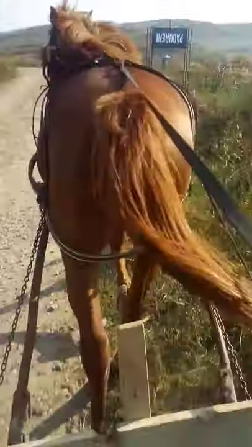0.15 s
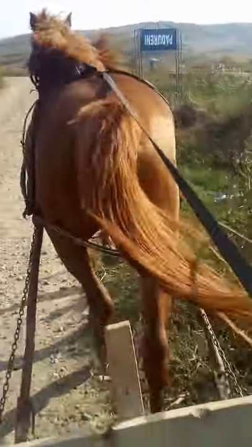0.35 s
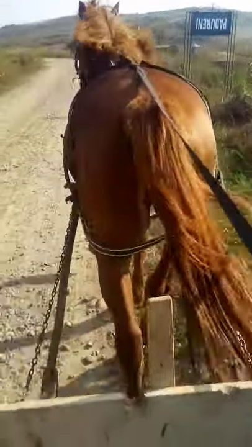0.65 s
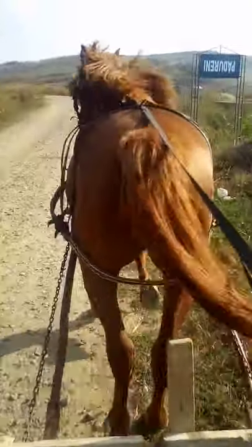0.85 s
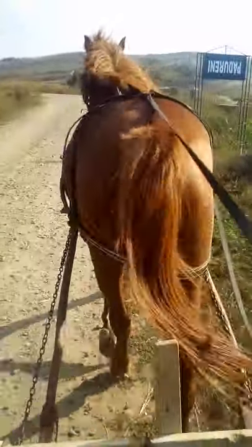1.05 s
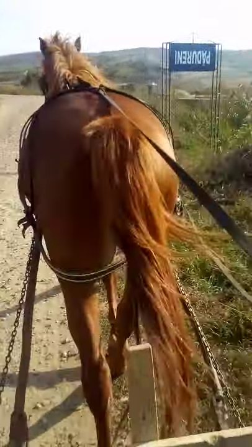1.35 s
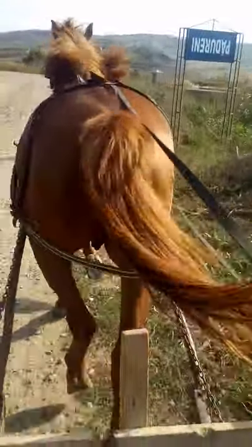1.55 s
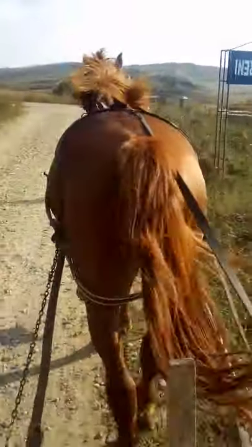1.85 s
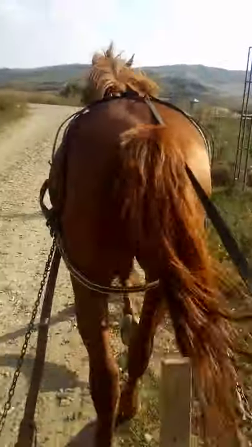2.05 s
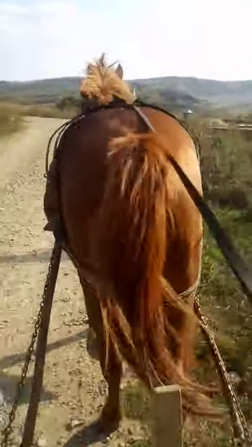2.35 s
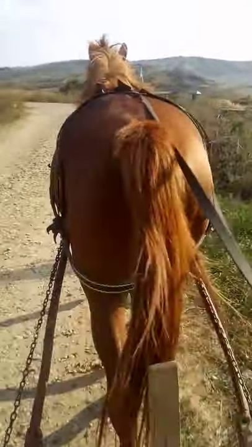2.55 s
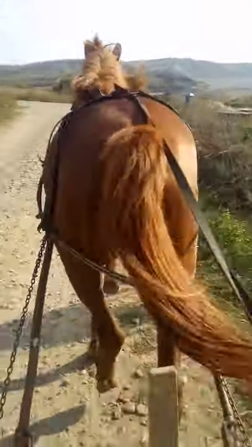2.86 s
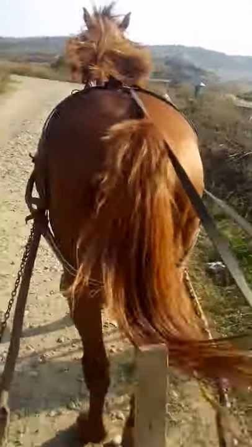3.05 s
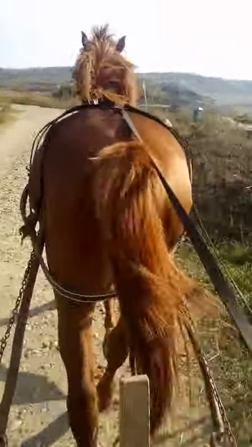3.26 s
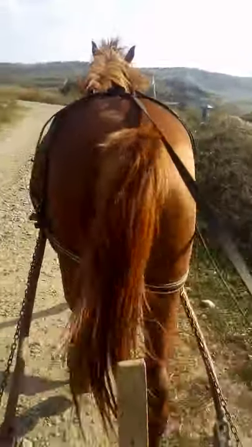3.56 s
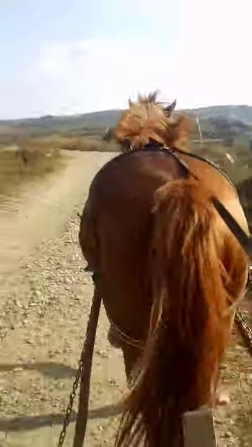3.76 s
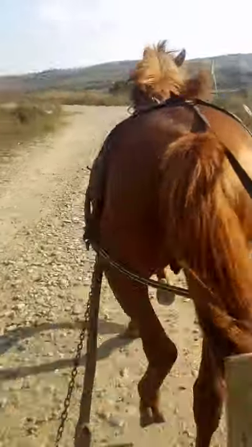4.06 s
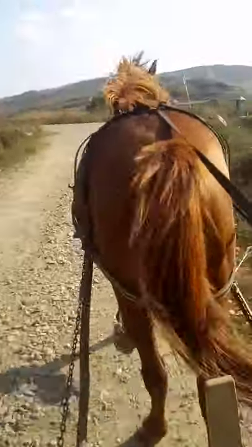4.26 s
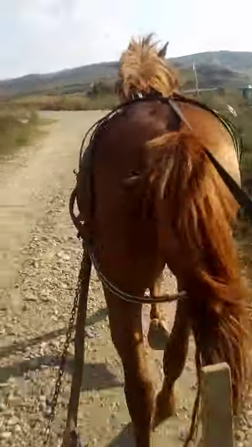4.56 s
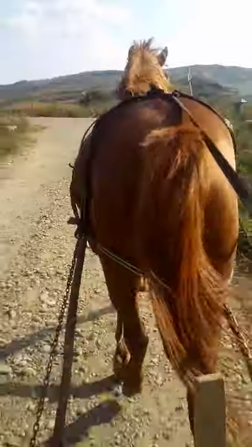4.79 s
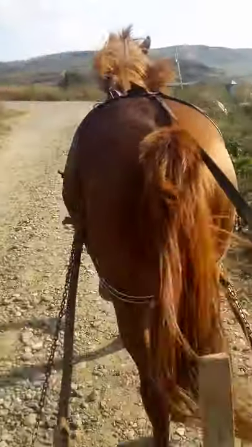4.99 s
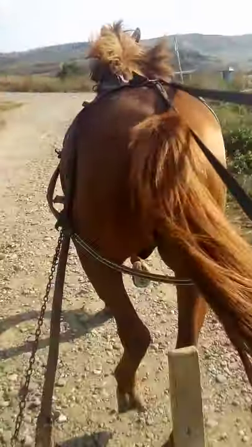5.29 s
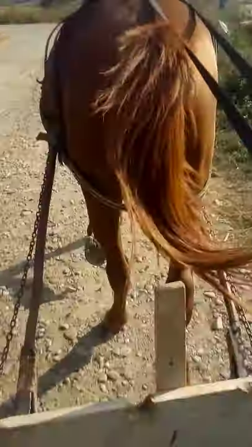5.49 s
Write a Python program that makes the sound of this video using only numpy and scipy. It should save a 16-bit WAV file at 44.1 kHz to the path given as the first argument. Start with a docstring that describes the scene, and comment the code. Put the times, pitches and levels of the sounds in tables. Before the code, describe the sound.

Heard from the cart bed: low rumble, crunching stones, hoof knocks and jingling iron, a sudden brief dropout, then more until a short bright hiss.

```python
"""Boards rumble and thump, hooves and stones knock, and chains and iron rattle in bursts: a wooden cart on
a gravel road behind a walking horse, heard from the bed. The sound drops out for half a second; a bright
hiss comes near the end. Rumble, gravel and hiss are filtered clicks or noise, blows and snaps are damped
tones, and the iron is clicks that ring resonators."""
import sys
import numpy as np
from scipy import signal
from scipy.io import wavfile

SR = 44100
rng = np.random.default_rng(int(sys.argv[2]) if len(sys.argv) > 2 else 0)


def master(y):
    """Save y as 16-bit WAV."""
    cut = np.clip(np.atleast_2d(y).T, -1, 1)
    pcm = np.round(cut * 32767)  # scale
    wavfile.write(sys.argv[1], SR, pcm.astype(np.int16))


N = 248283
T = np.arange(N) / SR


def amp(db):
    """Decibels to gain."""
    return 10 ** (np.asarray(db) / 20)


def rms_one(x):
    """Scale to unit rms."""
    return x / np.sqrt(np.mean(x ** 2) + 1e-20)


def drift(rate_hz):
    """Slow random curve of spread 1, about rate_hz changes a second."""
    step = 20  # samples between computed points
    pole = np.exp(-2 * np.pi * rate_hz * step / SR)
    noise = rng.standard_normal(N // step + 3002)
    slow = signal.lfilter([1], [1, -2 * pole, pole * pole], noise)[3000:]
    slow = np.concatenate([slow]) if len(slow) > 2 else slow
    return slow


def drift(rate_hz):
    """Slow random curve of spread 1, about rate_hz changes a second."""
    step = 20  # samples between computed points
    pole = np.exp(-2 * np.pi * rate_hz * step / SR)
    noise = rng.standard_normal(N // step + 3002)
    slow = signal.lfilter([1], [1, -2 * pole, pole * pole], noise)[3000:]
    return np.interp(np.arange(N) / step, np.arange(len(slow)), rms_one(slow - slow.mean()))


def grains(per_s, spread_db):
    """Random clicks of uneven size and sign; rms 1."""
    size_db = spread_db * np.minimum(rng.exponential(1, N), 4)
    sizes = amp(size_db) * rng.choice([-1, 1], N)
    return rms_one(sizes * (rng.random(N) < per_s / SR))


def ring(drive, hz, t60_s):
    """Two-pole resonator: a unit click starts a decaying sine of height 1."""
    pole, w = amp(-60 / (t60_s * SR)), 2 * np.pi * hz / SR
    return signal.lfilter([0, np.sin(w)], [1, -2 * pole * np.cos(w), pole * pole], drive + 1e-18)


def band(x, edges_hz):
    """Butterworth band-pass."""
    return signal.sosfilt(signal.butter(2, edges_hz, "band", fs=SR, output="sos"), x)


def band_twice(x, edges_hz):
    """Steeper band-pass; rms 1."""
    return rms_one(band(band(x, edges_hz), edges_hz))


def banded(sources, spectrum, patchy_db, patch_rate_hz):
    """Third-octave bands dealt from two unrelated sources, each band flickering on its own; rms 1."""
    hz, db = np.transpose(spectrum)
    octaves = np.log2(min(hz[-1], .45 * SR) / hz[0])
    edges = hz[0] * 2 ** np.arange(0, octaves, 1 / 3)
    out = 0
    for k, (low, high) in enumerate(zip(edges, edges[1:])):
        level_db = np.interp(np.log(low * high) / 2, np.log(hz), db)
        flicker_db = patchy_db * drift(patch_rate_hz)
        out = out + amp(level_db + flicker_db) * band(sources[k % 2], [low, high])
    return rms_one(out)


def swell(start_s, attack_s, hold_s, release_s):
    """Gain that rises out of -30 dB, holds and sinks again."""
    corners = start_s + np.cumsum([0, attack_s, hold_s, release_s])
    return amp(np.interp(T, corners, [-30, 0, 0, -30], left=-120, right=-120))


def blows(table, rise_s, t60_s, noisy):
    """Each blow: a damped tone with a soft start, plus a puff of noise round its pitch."""
    out = np.zeros(N)
    for s, db, hz in table:
        start = round(s * SR)
        t = T[:min(6000, N - start)]
        shape = (1 - np.exp(-t / rise_s)) * amp(-60 * t / t60_s)
        puff = rms_one(band(rng.standard_normal(6000), [hz / 1.57, hz * 2.59]))[:len(t)]
        sound = (np.sin(2 * np.pi * hz * t) + noisy * puff) / (1 + noisy)
        out[start:start + len(t)] += amp(db) * shape / shape.max() * sound
    return out


def hiss():
    """Bright noise, with thin whistles that waver in level, swells and fades."""
    # noise colour: (frequency [Hz], relative density [dB per Hz])
    colour = [(6000, -1), (8000, -14), (9000, -20), (10400, -9), (12800, -1), (13600, -12), (15100, 0),
              (19000, 0)]
    noise = banded(rng.standard_normal((2, N)), colour, patchy_db=3, patch_rate_hz=15)
    whistles = np.zeros(N)
    for hz in np.geomspace(9000, 15300, 12):
        whistles += amp(5 * drift(6)) * rms_one(ring(noise, hz, t60_s=.025))
    mix = rms_one(noise + amp(-6.0) * rms_one(whistles))
    return amp(-42.5) * swell(5.405, attack_s=0.022, hold_s=0.17, release_s=0.054) * mix


def gravel(grind_db):
    """Stones give way under the rims in clumps: a banded grind and a brighter, weaker scrape."""
    # grind colour: (frequency [Hz], relative density [dB per Hz])
    colour = [(250, -14.5), (450, 1.5), (800, -2), (1100, -6), (1600, -19.5)]
    crunch_db = grind_db + 1.6 * drift(30)
    stones = [grains(2000, spread_db=2.5), grains(2000, spread_db=2.5)]
    grind = banded(stones, colour, patchy_db=1.2, patch_rate_hz=25)
    scrape = band_twice(grains(3000, spread_db=3), (1190, 2700))
    return amp(crunch_db) * grind + amp(crunch_db - 12.5) * scrape


def drag():
    """One rim drags over loose stones: coarse slips, all jerking the same way, brighter than the grind."""
    # drags: (start [s], hold [s], level [dB])
    drags = [(1.153, 0.092, -35.5), (1.307, 0.089, -35.5), (1.615, 0.052, -31.5), (4.47, 0.081, -34.5)]
    push = sum(amp(db) * swell(s, 0.029, hold_s, 0.027) for s, hold_s, db in drags)
    slips = -abs(grains(2200, spread_db=3.5))
    return push * band_twice(slips, (750, 3000))


def snaps():
    """Pebbles snap under a rim: single hard clicks that ring only a few cycles."""
    # snaps: (time [s], level before the rise [dB], pitch [Hz])
    pebbles = [(0.3175, -25, 3000), (0.333, -14, 2780), (0.7265, -17, 2600), (0.875, -10.5, 1390),
               (0.9848, -14, 1960), (1.1691, -6.5, 1210), (1.2014, -12, 2450), (1.2059, -12.5, 2100),
               (1.2242, -10, 1770), (1.2447, -11.5, 3680), (1.3967, -13, 2070), (1.4664, -21, 3570),
               (1.5795, -15, 3200), (1.7766, -25, 3750), (1.8135, -20, 2950), (1.8807, -13, 4200),
               (1.963, -14, 2760), (2.132, -15, 1550), (2.2671, -10, 3270), (2.624, -12, 1510),
               (2.8044, -16, 3190), (2.8769, -11.5, 2280), (2.881, -19, 3250), (2.9406, -19, 2970),
               (3.7506, -15, 3330), (3.8348, -8, 3400), (3.8728, -14, 4310), (4.0744, -15, 3203),
               (4.098, -15, 2240), (4.131, -21, 4950), (4.6365, -12, 2000), (4.641, -26, 2700),
               (5.0135, -12.5, 2230), (5.078, -9, 3180), (5.2382, -15, 2320), (5.242, -4, 1210),
               (5.312, -22, 3190)]
    t60_s, rise_s = .0026, .00007
    t = T[:800]
    out = np.zeros(N)
    for s, db, hz in pebbles:
        start = round(s * SR)
        envelope = amp(db - 60 * t / t60_s) * (1 - np.exp(-t / rise_s))
        out[start:start + 800] -= envelope * np.sin(2 * np.pi * hz * t)
    return out


def chinks(edges_hz):
    """Clicks dealt to ten short resonators across a register, each flaring up on its own; rms 1."""
    ring_cycles, flare_db = 36, 2.6
    clicks, dealt = grains(3500, spread_db=2.8), rng.integers(0, 10, N)
    rings = np.zeros(N)
    for k, hz in enumerate(np.geomspace(*edges_hz, 10)):
        drive = clicks * (dealt == k) * amp(flare_db * drift(35.0))
        rings += ring(drive, hz, ring_cycles / hz)
    return band_twice(rings, edges_hz)


def iron(chatter_db):
    """Links collide in dense clusters that die away; the clicks chink briefly and ring the iron modes."""
    # shakes of chain and iron: (time [s], reference level [dB],
    # jingle re reference [dB], sizzle re reference [dB], t60 [s])
    shakes = [(0.075, -29, -7, -34, 0.08), (0.212, -24.5, -6, -20, 0.085), (0.3127, -23, -30, -43, 0.13),
              (0.329, -31, -19, -38, 0.068), (0.36, -22, -21, -40, 0.17), (0.374, -21, -24, -35, 0.076),
              (0.553, -32, -13, -25, 0.87), (0.7022, -15, -34, -49, 0.059), (0.774, -30.5, -6, -17, 0.053),
              (0.846, -19.5, -13, -26, 0.025), (0.955, -14.5, -33, -41, 0.052),
              (0.9682, -26.5, -12, -24, 0.15), (1.015, -24.5, -19, -32, 0.17),
              (1.089, -24, -13, -30, 0.099), (1.264, -27, -19, -46, 0.17), (1.297, -37, -3, -32, 0.19),
              (1.329, -22, -17, -36, 0.061), (1.368, -31, -4, -32, 0.053), (1.4653, -21.5, -9, -29, 0.1),
              (1.557, -33, -1, -38, 0.05), (1.5802, -18.5, -16, -38, 0.1), (1.611, -27, -6, -32, 0.17),
              (1.629, -19, -9.5, -30, 0.14), (1.648, -25, -12, -37, 0.14), (1.672, -27, -25, -44, 0.27),
              (1.715, -23.5, -14, -24, 0.15), (1.735, -24.5, -16, -27, 0.23), (1.776, -12.5, -6, -27, 0.04),
              (1.8093, -17, -11, -32, 0.087), (1.8585, -29, -3, -15, 0.047), (1.88, -13, -23, -45, 0.045),
              (1.9866, -21.5, -15, -34, 0.17), (2.056, -24.5, -9, -18, 0.14),
              (2.156, -10.5, -10, -31, 0.038), (2.187, -8.5, -37, -44, 0.036), (2.265, -23, -5, -39, 0.02),
              (2.316, -12.5, -12.5, -30, 0.067), (2.351, -17, -10, -26, 0.086),
              (2.362, -23, -13, -29, 0.08), (2.378, -16, -15, -34, 0.058), (2.391, -21.5, -12, -36, 0.054),
              (2.4096, -14, -4.5, -19, 0.027), (2.416, -25, -3, -25, 0.018),
              (2.5042, -13.5, -25, -41, 0.062), (2.559, -16, -10, -32, 0.027),
              (2.619, -28.5, -7, -23, 0.18), (2.799, -11, -45, -38, 0.057), (2.8344, -25, -28, -33, 0.068),
              (2.874, -37, -25, -20, 0.15), (2.937, -22, -14, -24, 0.2), (3.029, -32, -2, -13, 0.093),
              (3.106, -10.5, -31, -25.5, 0.089), (3.629, -13, -28, -23, 0.038),
              (3.6613, -31.5, 5, -12, 0.11), (3.7045, -19.5, -27, -40, 0.27), (3.735, -17, -28, -29, 0.066),
              (3.808, -9.5, -22, -34, 0.063), (3.8342, -18, -53, -51, 0.13), (3.872, -25.5, -7, -23, 0.17),
              (3.95, -21, -14.5, -33, 0.31), (4.0736, -14.5, -23, -28, 0.045),
              (4.133, -20.5, -14, -24, 0.12), (4.149, -28.5, -11, -43, 0.38), (4.2537, -17, -12, -23, 0.1),
              (4.3914, -30, -4, -23, 0.087), (4.4109, -26, -20, -28, 0.27), (4.459, -21, -11, -24, 0.07),
              (4.485, -16.5, -18, -41, 0.45), (4.522, -29, -1.5, -11, 0.29), (4.633, -23, -22, -28, 0.016),
              (4.6885, -10.5, -33, -26, 0.034), (4.79, -21.5, -6, -19, 0.075), (4.84, -29, -18, -36, 0.08),
              (4.846, -17, -18, -39, 0.067), (4.885, -35, 2, -5.5, 0.23), (4.998, -19, -18, -27, 0.15),
              (5.075, -21, -47, -47, 0.027), (5.162, -27, -31, -18, 0.03), (5.186, -14, -3, -19, 0.073),
              (5.194, -21, -2, -17, 0.078), (5.251, -47, 3, -4, 0.18), (5.309, -24.5, -25, -31, 0.055),
              (5.414, -19.5, -11, -23, 0.096), (5.47, -21.5, -31, -34, 0.18),
              (5.5424, -22.5, -14, -18, 0.058), (5.619, -20.5, -20, -33, 0.08)]
    # iron modes: (frequency [Hz], relative level [dB], t60 [s])
    modes = [(2094, 5, 0.0088), (2685, -4, 0.0448), (3073, 6.5, 0.025), (3300, 5, 0.0031),
             (3600, -11, 0.046), (3880, -0.5, .04), (4180, 1, 0.0091), (4580, -4, 0.037), (4850, 4, 0.028),
             (5210, 0, 0.024), (5604, -1.5, .05), (5900, -10, 0.045), (6510, 5, 0.075), (6250, 3, 0.035),
             (7180, 10.5, 0.062), (7400, 3.5, 0.037), (8000, -5, .07), (8670, 8, 0.071),
             (10120, -13, 0.044), (10550, 5, 0.089), (11500, -0.5, .1), (14850, -7.5, .08)]
    clank_hz, jingle_hz, sizzle_hz, air_hz = (2450, 4950), (5740, 7660), (6900, 10960), (14300, 15770)

    # rows: clank, jingle, sizzle
    under_chatter_db = np.array([[0], [8.5], [24.5]])
    steady = amp(chatter_db + 3.4 * drift(20) - under_chatter_db)
    home = np.searchsorted([jingle_hz[0], sizzle_hz[0]], np.array(modes)[:, 0])  # row of each mode
    shake, struck = steady.copy(), steady[home] * amp(-2.5)
    luck = rng.normal(0, 1, (len(shakes), len(modes)))
    for (s, ref_db, jingle_db, sizzle_db, t60_s), chance in zip(shakes, luck):
        start = round(s * SR)
        t = T[:min(8000, N - start)]
        levels = amp(ref_db + np.array([-7.5, jingle_db, sizzle_db]))
        shape = (1 - np.exp(-t / 0.0014)) * amp(-60 * (t / max(t60_s, .01)) ** 1.105)
        burst = levels[:, None] * shape
        shake[:, start:start + len(t)] += burst
        # each shake favours other modes
        favoured = amp(4.0 * np.clip(chance, -3, 1.3))
        struck[:, start:start + len(t)] += burst[home] * favoured[:, None]

    out = np.zeros(N)
    # the air register follows the sizzle envelope
    registers = zip((clank_hz, jingle_hz, sizzle_hz, air_hz), (-10.0, -9.5, -7.5, -19.5), shake[[0, 1, 2, 2]])
    for edges_hz, direct_db, envelope in registers:
        out += amp(direct_db) * envelope * chinks(edges_hz)
    clicks = grains(1500, spread_db=8.0)
    for k, (hz, db, t60_s) in enumerate(modes):
        drive = struck[k] * np.roll(clicks, 997 * k)  # shifted so that modes do not start together
        evened = ring(drive, hz, t60_s) / np.sqrt(t60_s * SR / 28)  # long rings turned down
        out += amp(db - 22.0) * evened
    return out


def knocks():
    """Hooves and stones knock: sharp-edged damped tones with some noise."""
    # knocks: (time [s], envelope peak [dB], pitch [Hz])
    table = [(0.084, -20.5, 700), (0.2775, -18.5, 660), (0.313, -17, 550), (0.382, -17, 417),
             (0.431, -24, 533), (0.586, -17, 428), (0.588, -20.5, 870), (0.707, -17, 530),
             (0.873, -18.5, 630), (0.983, -19, 543), (0.7565, -31, 885), (1.1665, -29, 635),
             (1.195, -25, 474), (1.218, -22, 740), (1.37, -15, 437), (1.404, -20, 557), (1.878, -17.5, 610),
             (1.917, -20, 690), (1.939, -32, 700), (2.078, -25, 510), (2.119, -19, 710), (2.132, -22, 515),
             (2.169, -19.5, 910), (2.2, -19.5, 597), (2.543, -25, 574), (2.4605, -27, 756),
             (2.5765, -14, 703), (2.588, -25, 474), (2.607, -26, 630), (2.711, -18.5, 750),
             (2.785, -24, 614), (2.857, -23, 466), (2.875, -11, 435), (2.879, -32, 870), (3.047, -20, 500),
             (3.75, -19, 590), (3.962, -18.5, 634), (4.235, -14, 560), (4.259, -13.5, 408),
             (4.31, -22, 535), (4.389, -39, 560), (4.459, -21, 420), (4.537, -22.5, 980), (4.554, -25, 680),
             (4.571, -18.5, 420), (4.6345, -16, 957), (4.640, -16, 873), (4.649, -32, 800),
             (4.721, -20, 427), (5.24, -27, 803), (5.357, -18, 520), (5.381, -14, 473), (5.507, -16, 398)]
    return blows(table, rise_s=0.00027, t60_s=.055, noisy=.3)


def rumble(rumble_db):
    """Dense bumps shake the boards of the bed: clicks filtered to a low spectrum."""
    # bed colour: (frequency [Hz], relative density [dB per Hz])
    colour = [(15, -31.5), (25, -30), (70, 0.5), (123, 4), (224, 1), (318, -4.5), (464, -11.5),
              (500, -20.5), (650, -42), (1100, -120)]
    bumps = [grains(500, spread_db=1.5), grains(500, spread_db=2.5)]
    return amp(rumble_db) * banded(bumps, colour, patchy_db=1.0, patch_rate_hz=70)


def thumps():
    """Wheels jolt the bed: low damped tones with a soft start."""
    # thumps: (time [s], envelope peak [dB], pitch [Hz])
    table = [(0.014, -10, 238), (0.228, -10.5, 174), (0.473, -8.5, 192), (0.584, -12, 130),
             (0.611, -17, 171), (0.72, -14, 140), (0.921, -23, 128), (1.172, -16.5, 170), (1.224, -20, 153),
             (1.498, -13.5, 253), (2.073, -15, 242), (2.119, -13, 172), (2.431, -14, 176),
             (2.478, -10, 230), (2.575, -13, 254), (2.606, -12.5, 155), (2.637, -13.5, 144),
             (2.72, -9, 213), (2.783, -15, 223), (2.875, -12.5, 200), (2.902, -19, 180), (3.064, -17, 256),
             (3.631, -8.5, 154.5), (3.721, -17, 167), (3.816, -13, 244), (3.847, -13, 181),
             (3.962, -10.5, 219), (4.395, -18, 149), (4.456, -14.5, 240), (4.514, -12.5, 169),
             (4.712, -11.5, 227), (4.955, -10.5, 181), (5.117, -11, 215), (5.239, -9.5, 213),
             (5.264, -13, 200), (5.382, -9, 200), (5.479, -12, 238)]
    return blows(table, rise_s=0.0051, t60_s=.055, noisy=0.28)


def scene():
    """Hiss, gravel, drag, snaps, iron, knocks, rumble and thumps."""
    # ride, in two stretches: (time [s], rumble [dB], grind [dB], chain chatter [dB])
    ride = [
        [(0.0, -22.5, -31, -36.5), (0.63, -22, -34, -38.5), (0.76, -25, -34, -40.5), (0.98, -22.5, -33, -49.5),
         (1.14, -22, -31.5, -45), (1.31, -26.5, -29, -50), (1.5, -26, -32, -44), (1.76, -24.5, -34, -45),
         (1.86, -28.5, -41, -40.5), (1.93, -23, -28.5, -37), (2.14, -20.5, -28.5, -30),
         (2.37, -28.5, -34, -37.5), (2.45, -27, -39.5, -35.5), (2.6, -25, -30.5, -35.5), (2.9, -22, -33, -32.5),
         (3.0, -23, -33, -37.5), (3.105, -20, -32, -40)],
        [(3.64, -24, -36.5, -34), (3.85, -25.5, -34, -36.5), (3.982, -24, -33.5, -39.5),
         (4.316, -23, -30.5, -39.5), (4.672, -23, -31.5, -39.5), (4.85, -23.5, -30.5, -31.5),
         (5.088, -24.5, -32.5, -38.5), (5.272, -21.5, -31.5, -35.5), (5.63, -21.5, -33, -40.5)],
    ]
    s, *columns = np.transpose(np.vstack(ride))
    rumble_db, grind_db, chatter_db = (np.interp(T, s, c) for c in columns)
    ground = gravel(grind_db) + drag() + snaps()
    cart = iron(chatter_db) + knocks() + rumble(rumble_db) + thumps()
    return (hiss() + ground + cart)[None]


def record(dry):
    """Round the peaks, mute for a moment, add a one-sided tick just after, and cut the top treble."""
    mute_start_s, mute_end_s = 3.1100, 3.6299
    tick_s, tick_db, tick_decay_s = 3.6619, -9.5, 0.00024
    cutoff_hz = 15900 * 1.03  # stopband edge, 60 dB down
    out = .6 * np.tanh(dry / .6)
    out = out * ((T < mute_start_s) | (T > mute_end_s))
    tick = (T > tick_s) * np.exp(-np.maximum(T - tick_s, 0) / tick_decay_s)
    out = out + amp(tick_db) * tick
    return signal.sosfilt(signal.cheby2(16, 60, cutoff_hz, fs=SR, output="sos"), out)


dry = scene()
out = record(dry)
master(out)
```